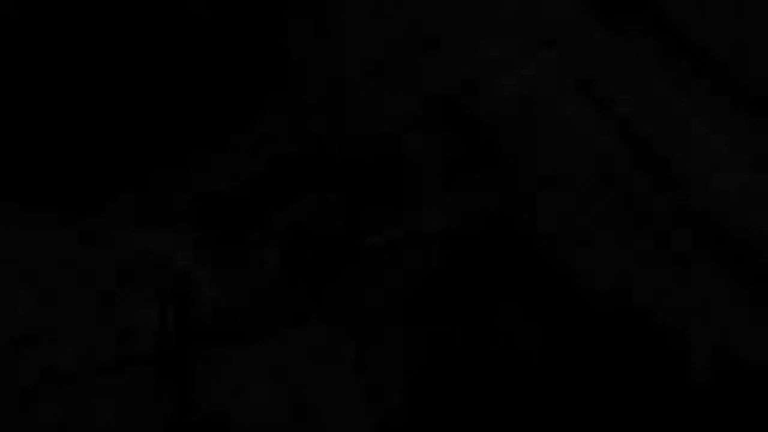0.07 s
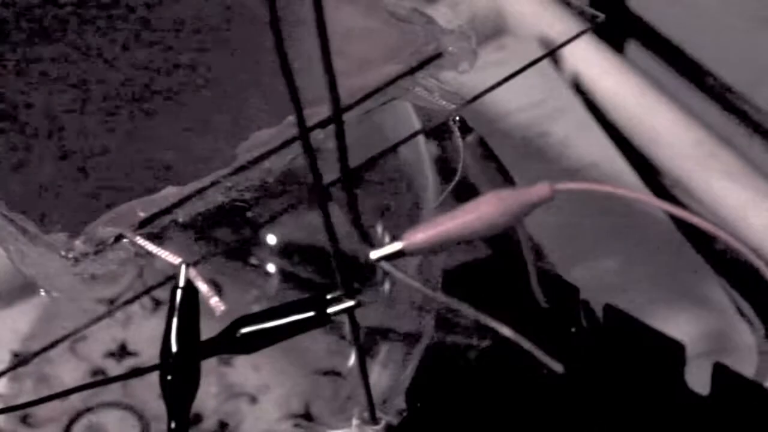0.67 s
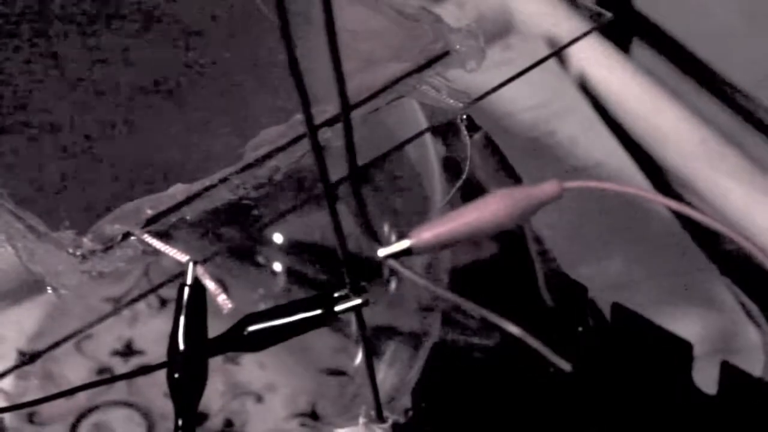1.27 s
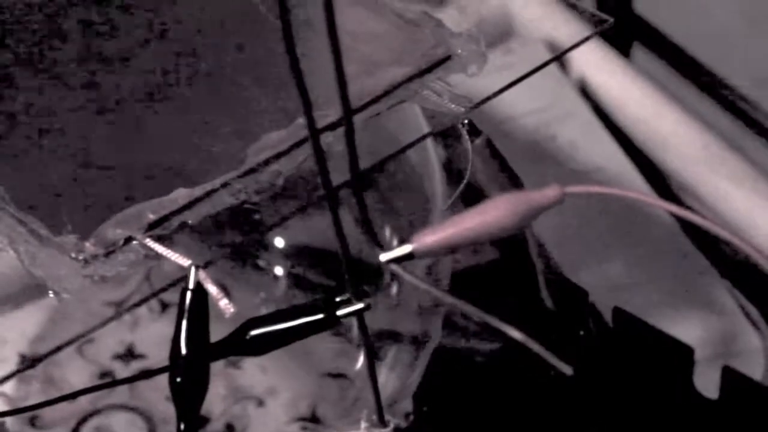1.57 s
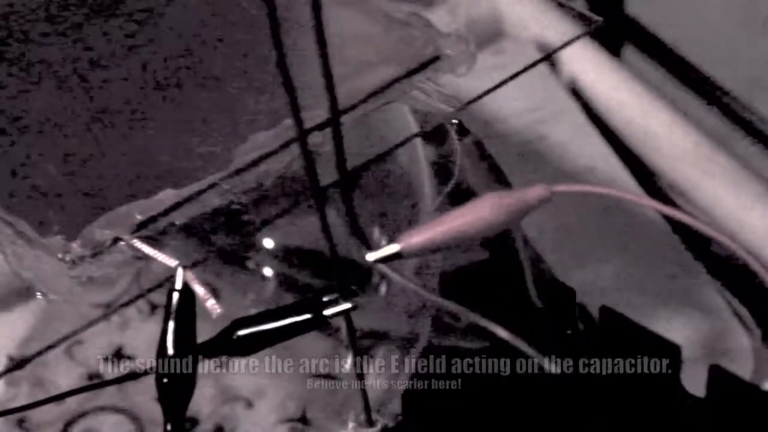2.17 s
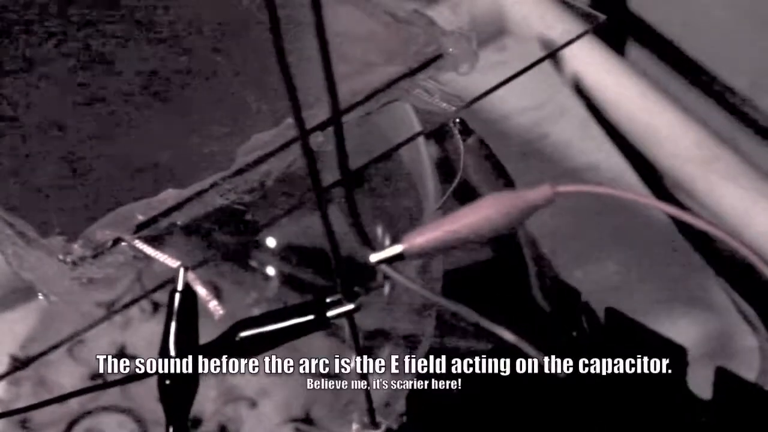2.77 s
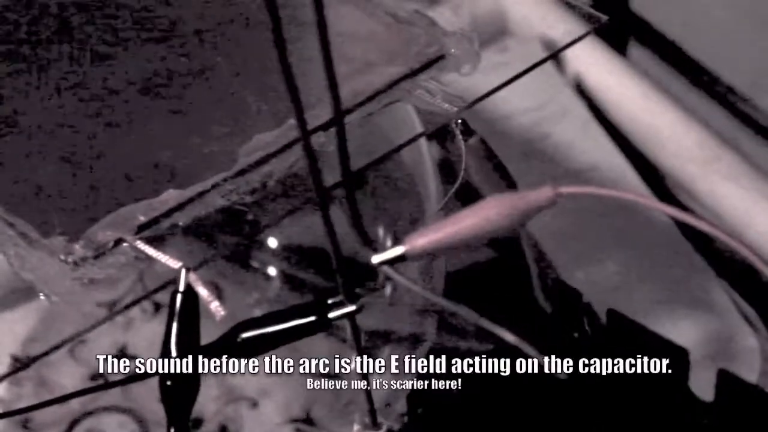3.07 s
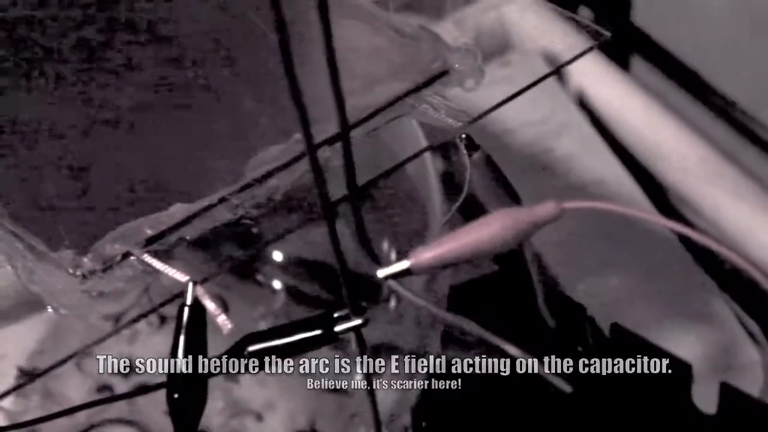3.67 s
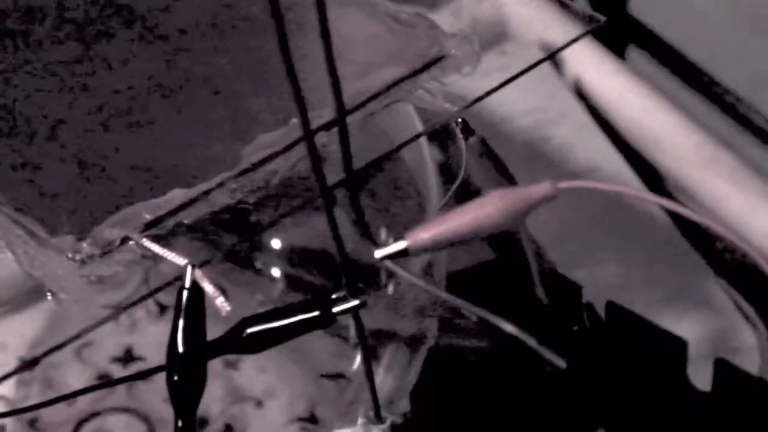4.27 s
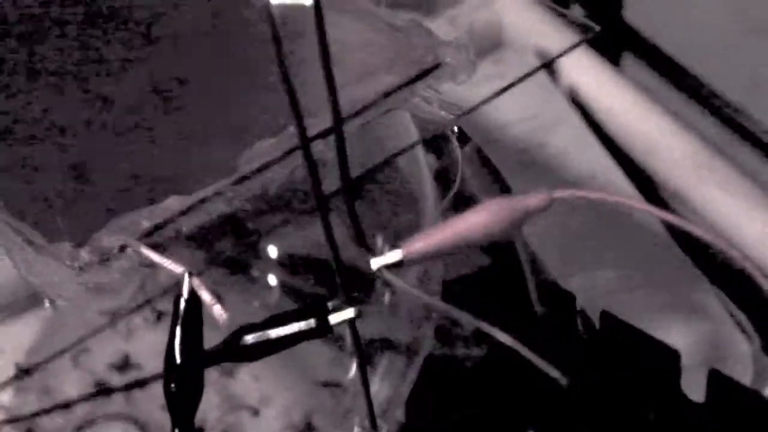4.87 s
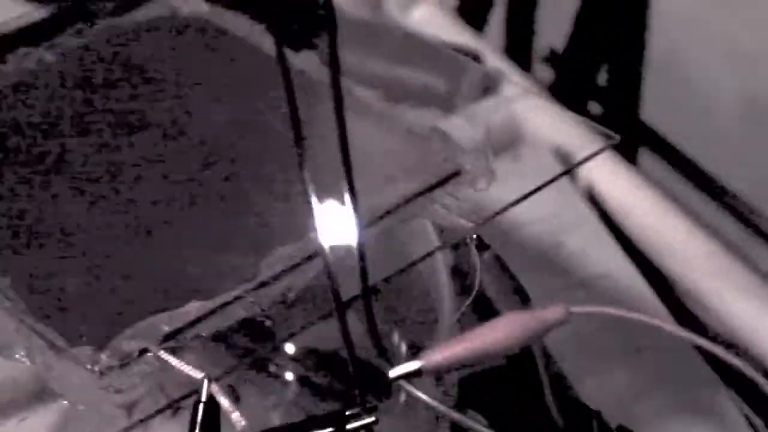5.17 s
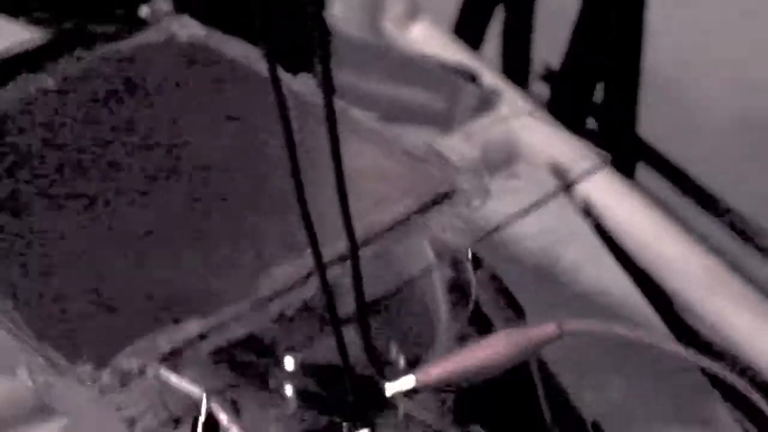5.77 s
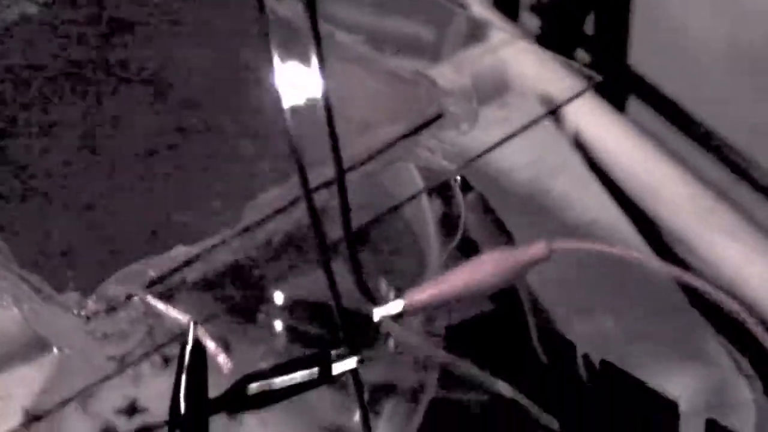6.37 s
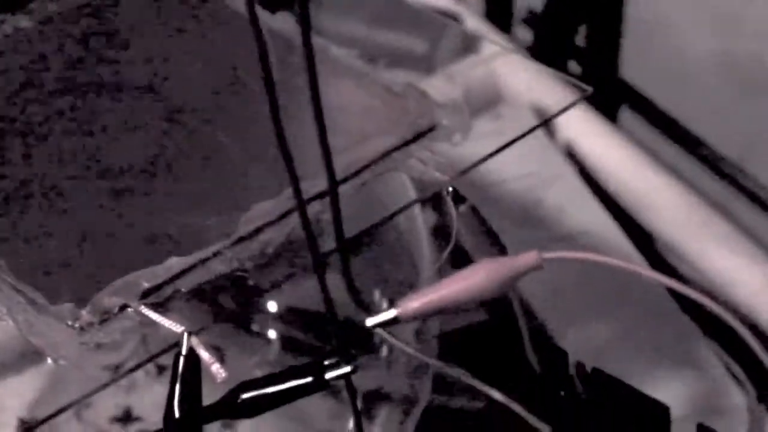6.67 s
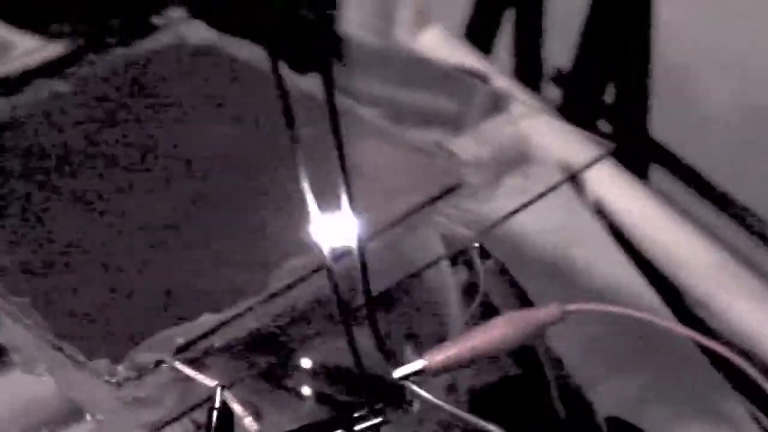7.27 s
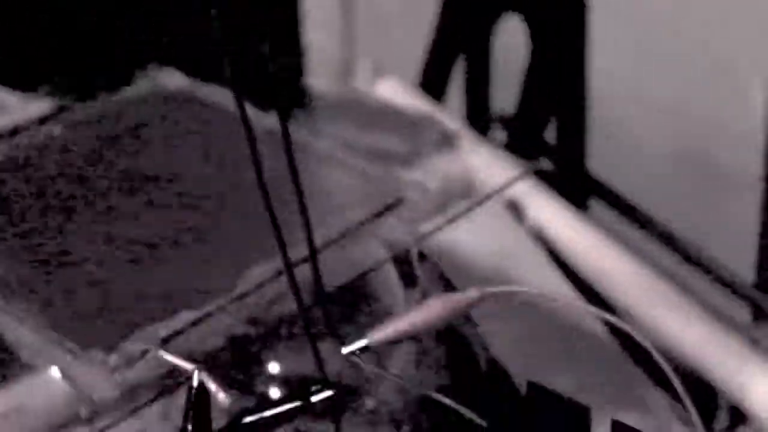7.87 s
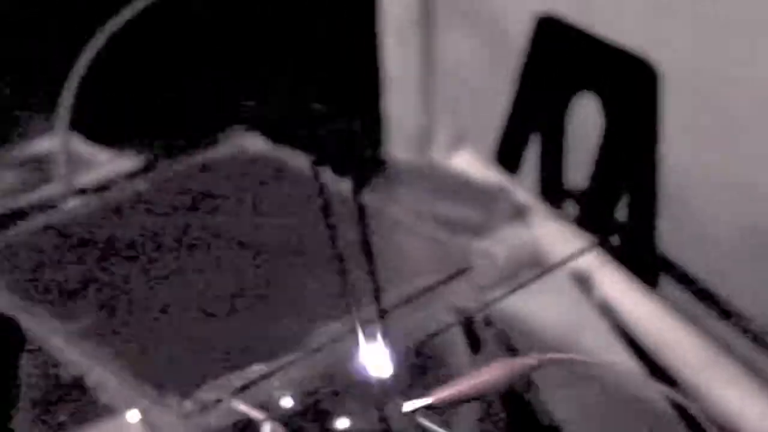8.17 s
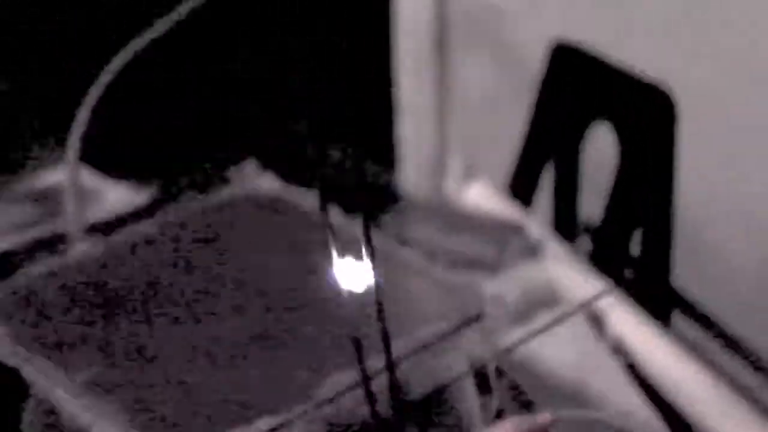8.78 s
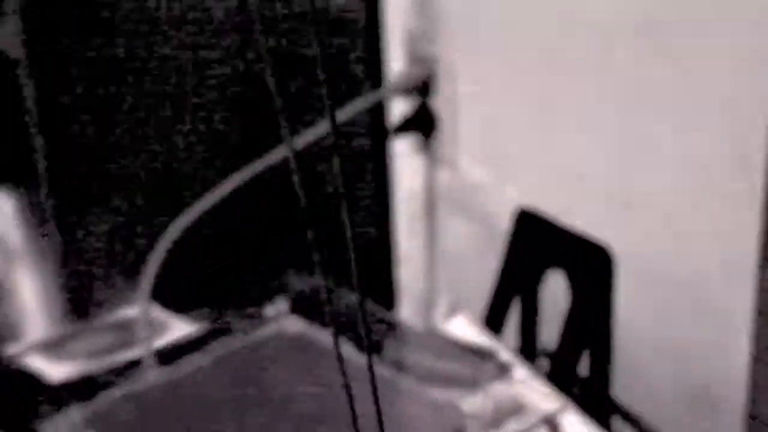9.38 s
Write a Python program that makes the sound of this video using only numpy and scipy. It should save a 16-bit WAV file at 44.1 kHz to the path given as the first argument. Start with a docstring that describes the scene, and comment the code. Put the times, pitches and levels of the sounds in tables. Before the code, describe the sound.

Mains hum and fine sizzling build in a small room until an electric arc cracks alight, sputtering and buzzing harshly five times.

```python
"""First come a soft scrape and small handling clicks over the air of a small room and a faint whine.
Close by stands a high-voltage ladder of two wires. As the mains voltage is raised, a capacitor hums
and tiny discharges (corona) hiss; then the gap breaks down with a bang. Five times an arc catches and
lifts off sputtering; the later ones settle to a buzz, and the last still burns at the end.
The arc strikes anew on every half cycle of the mains and overloads the microphone."""
import sys
import numpy as np
from scipy import signal
from scipy.io import wavfile

SR = 44100
rng = np.random.default_rng(int(sys.argv[2]) if len(sys.argv) > 2 else 0)


def store_pcm(level_fs):
    """Save levels as 16-bit WAV."""
    pcm = np.round(np.clip(level_fs, -1, 1) * 32767).astype(np.int16)
    wavfile.write(sys.argv[1], SR, np.atleast_2d(pcm).T)


N = 420273
TIME = np.arange(N) / SR
PULSE_HZ, BREAKDOWN_S = 120.01, 4.3915  # two pulses per mains cycle; when the gap first gives way

# Levels in the tables are relative: the functions add their own gains.
# each climb of the arc: (strike time [s], lifts off after [s], settles after [s] if it still burns,
# level at the foot [dB], level once lifted [dB], final swell [dB])
ARC_CLIMBS = [(4.398, 0.077, .8, -21.5, -19.5, 4.5), (5.009, 0.12, .46, -23, -18.5, 4.5),
              (5.99, 0.18, 0.73, -26.5, -19, 10.5), (6.865, .207, 0.71, -22, -17, 7),
              (8.224, .18, 0.99, -24.5, -20.5, 4.5)]
# the arc flares up: (time [s], half length [s], extra level [dB], extra body [dB], extra thump [dB])
ARC_FLARES = [(4.503, 0.036, 5.5, 5, 9), (4.625, 0.061, 7, 4, 7), (4.747, 0.043, 3, 4.5, 0),
              (4.906, 0.01, 5, -3, 23), (5.224, .08, 5.5, 3.5, 4), (5.375, 0.053, 3, -2.5, 7),
              (6.25, 0.036, 2.5, 4.5, 2), (6.364, 0.022, 3.5, 5.5, 21), (6.548, 0.02, 3, 1, 20),
              (6.656, 0.015, 4, -7, 27), (7.18, 0.071, 2.5, 4, -9), (7.37, 0.0785, 5.5, 3, -8),
              (7.591, 0.04, 5.5, 6, -9), (8.578, 0.11, 1, 3.5, 0), (8.706, 0.0325, 8, 7.5, 4),
              (8.931, 0.032, 6, 7, 27), (9.027, 0.071, 1.5, -2, 28.5)]
# an old, long arc strikes again within the half cycle: (delay [s], size against the first spark [ratio])
ARC_RESTRIKES = [(.0013, 0.22), (.00215, 0.3)]
# the tone of one spark: (frequency [Hz], level [dB])
SPARK_SPECTRUM = [(100, -42.5), (260, -24.5), (370, -17), (600, -30), (1000, -17), (1600, -11),
                  (2100, -7.5), (2600, -4), (3500, -1), (4800, 2), (6500, 2), (9000, 1), (10500, -3.5),
                  (12000, -8.5), (15500, -17.5)]
# the moving microphone shades the arc:
# (time [s], level [dB], body [dB], treble [dB], top treble against the treble [dB], ring [dB])
MIC_AIM = [(4.4, 1, -.5, 2.5, 3.5, 1.5), (5.8, 0.37, 1, 1.5, -2, 3.5), (7.35, -2.5, -1, 1.5, -0.5, 1),
           (7.68, -1.5, -1.5, 3.5, -9, 4), (7.92, 9, -4.5, -3, -7, -5), (8.12, 3, -2.5, 1.5, 9, -14),
           (8.335, 0.5, -1, -5, -3, -8), (8.375, 1, -2, -2, 23, 0), (8.95, -.5, 1.5, 0.5, 23, 0.5),
           (9.5, 2, 4, -1.5, 11.5, -3)]
# heavy snaps, the first being the breakdown: (time [s], level [dB], decay time [s])
HEAVY_SNAPS = [(4.3916, 13, 0.0031), (4.783, 1.5, 0.0017), (4.899, -2, 0.00049), (4.993, 2.5, 0.002),
               (4.999, 4, 0.0025), (5.356, 3.5, 0.0016), (6.175, -8, 0.00068), (6.649, -5, 0.00084),
               (6.933, -9, 0.00061), (7.203, 4.5, 0.0012), (8.408, -14, .001), (8.692, 3, 0.0012),
               (8.726, 8, .0007), (8.934, 15, 0.00027), (8.942, 6, 0.00036), (9.026, 9, 0.00027),
               (9.1993, 0, .0016)]
# the tone of a heavy snap: (frequency [Hz], level [dB])
SNAP_SPECTRUM = [(60, 5.5), (220, 3.5), (450, -27), (800, -2), (1400, -4), (2300, 11.5), (3200, 2),
                 (5500, 11.5), (9000, 8.5), (15000, -1)]
# the hiss grows with the voltage: (time [s], level [dB])
HISS_LEVELS = [(1.4, -52.5), (1.87, -49), (2.02, -39.5), (2.68, -37.5), (3.25, -29), (3.8, -23.5),
               (4.35, -21.5)]
# the tone of the fine hiss: (frequency [Hz], level [dB])
HISS_SPECTRUM = [(50, -28), (220, 6.5), (800, -0.5), (1000, 7), (1400, 4), (1800, 12), (2300, 12),
                 (2850, 9.5), (3000, 11.5), (3170, 11.5), (6200, 3.5), (9700, 1.5), (11500, -10),
                 (15500, -20.5)]
# the tone of streamers, the coarser threads of discharge: (frequency [Hz], level [dB])
STREAMER_SPECTRUM = [(240, -64), (400, -35), (486, -11), (526, -50), (591, -21), (830, -23), (983, -17.5),
                     (1380, -12), (2970, 0), (3300, -1.5), (4690, -1.5), (7120, -21), (9000, -35),
                     (11700, -34), (19800, -120)]
# the capacitor under rising voltage: (time [s], lowest note [dB], its octave [dB])
HUM_LEVELS = [(1.2, -57, -48), (1.76, -27, -60), (1.79, -27.5, -62), (1.91, -23, -45.5), (3.07, -22, -44.5),
              (3.65, -28, -39), (4.36, -27.5, -36.5)]
# higher notes in the hum: (multiple of the pulse rate [ratio], level against the octave [dB])
HUM_OVERTONES = [(3, -10), (4, -22), (5, -15), (8, -11.5)]
# small handling clicks: (time [s], level [dB])
HANDLING_CLICKS = [(0.384, -20.5), (0.532, -25), (0.55, -24), (0.614, -27), (1.014, -21), (1.154, -23.5),
                   (1.215, -27.5), (1.223, -25), (1.451, -24), (1.51, -27)]
# the notes of a plastic case: (frequency [Hz], level [dB], time to fade by 60 dB [s])
CASE_NOTES = [(930, -22, 0.02), (1550, -0.5, 0.022), (2380, 7, 0.022), (2970, 3, 0.026),
              (5370, 11.5, 0.0049)]
# short high pips: (time [s], level [dB], frequency [Hz])
HIGH_PIPS = [(0.7927, -30, 6360), (0.9078, -14.5, 4520), (1.08, -23, 4590)]
# the tone of the rasp: (frequency [Hz], level [dB])
RASP_SPECTRUM = [(40, -19), (200, -19), (1000, -13.5), (2200, -11), (4000, -15), (8000, -39)]
# dull knocks on either side of the rasp: (time [s], level [dB])
DULL_KNOCKS = [(8.309, -24), (8.355, -23)]
# the tone of the room air: (frequency [Hz], level [dB])
AIR_SPECTRUM = [(30, -3), (70, 0), (130, 6.5), (230, 3.5), (400, -4), (750, -6.5), (1100, -6), (3000, -6.5),
                (4700, -10.5), (6000, -13), (9000, -19.5), (12000, -28), (15500, -43)]
# a faint machine whine: (frequency [Hz], level [dB])
WHINE_NOTES = [(995.9, -65), (2019, -64.5), (3009, -67)]
# echoes from near surfaces: (delay [s], gain [ratio])
NEAR_ECHOES = [(.0015, 0.35), (.004, 0.34), (.0011, -0.1), (.0065, 0.32), (.0072, .2), (.0095, -0.03),
               (0.012, 0.13)]
# how long the room rings: (frequency [Hz], time to fade by 60 dB [s])
ROOM_DECAY = [(200, 0.25), (2000, 0.2), (6000, 0.16), (15000, 0.17)]
# the sound fades in: (time [s], gain [ratio])
FADE_IN = [(0, 0), (.14, 0), (.2, .35), (.3, .65), (.45, 1)]


def arc(arc_db=-3.5, body_db=-10, thump_db=-37, ring_db=-14.5, body_db_per_s=4.5, thump_db_per_s=1):
    """Bursts of sparks make a buzz that deepens as the arc stretches up the wires."""
    age, strength_db, spark_count, lifted = climb(TIME)
    _, flare_body_db, flare_thump_db = flares(TIME)
    aim_db, low_db, high_db, top_db, metal_db = follow(MIC_AIM, TIME)
    low_db = low_db + body_db_per_s * age + flare_body_db
    bursts, leaders = sparks()
    crack = colour(bursts, SPARK_SPECTRUM)
    # split the crackle into four bands and balance them anew
    body, dull, no_top = (below(crack, hz) for hz in (3300, 6800, 11200))
    bright, top = no_top - dull, crack - no_top
    treble = (bright + amp(top_db) * top) / np.sqrt(bright.var() + amp(2 * top_db) * top.var())
    tone = evened(dull - body) + amp(body_db + low_db) * evened(body) + amp(high_db) * treble
    tone -= 0.35 * (1 - lifted) * resonate(tone, hz=2970, q=5.1)  # hollow while still at the foot
    # the sputtering sparks set off a narrow metallic ring
    ring = evened(resonate(crack, hz=2075, q=12))
    tone += amp(ring_db + metal_db) * ring * np.clip(spark_count / 1.8, .7, 1.4)
    # a low thump comes with each leading spark
    thump = colour(leaders, [(20, -24), (110, 3.5), (240, 11.5), (450, 7.5), (850, 6.5), (1500, 5.5),
                             (4000, -50)])
    tone += thump * amp(thump_db + thump_db_per_s * age + flare_thump_db)
    return tone * amp(strength_db + aim_db + arc_db)


def sparks(short_gap_hz=5900, long_gap_hz=3900, late_s=.00018, limp_s=.00005, slots=14):
    """Each half cycle the gap fires and recharges in a quick burst. Gives all sparks, and the leaders."""
    start = BREAKDOWN_S + np.arange(5, int((N / SR - BREAKDOWN_S) * PULSE_HZ)) / PULSE_HZ
    age, _, spark_count, _ = climb(start)
    rate_hz = long_gap_hz + (short_gap_hz - long_gap_hz) * np.exp(-age / .3)  # long gaps recharge slowly
    rate_hz *= np.exp(0.0624 * np.interp(start, TIME, drift(20)))
    sputter = np.clip((spark_count - 2) / 3, 0, 1)  # long bursts are erratic
    late, spread, loud, heavy = rng.standard_normal((len(start), 4)).T
    waits = np.exp(0.2065 * rng.standard_normal((len(start), slots))) / rate_hz[:, None]
    first = start + late_s * (np.maximum(.7 * sputter, 0.17) * late + 2.2 * sputter - 1.1)
    first += age * (limp_s * (-1) ** np.arange(len(start)) - .0003 * age)  # long arcs limp, fire early
    times = first[:, None] + np.cumsum(waits, 1) - waits[:, :1]
    burst_length = np.maximum(spark_count * np.exp(0.39 * sputter * spread), 1)
    size = np.clip(burst_length[:, None] - np.arange(slots), 0, 1)
    size *= amp(2.3 * rng.standard_normal(size.shape))
    size += 0.053 * rng.exponential(1, size.shape) * (rng.random(size.shape) < .25)  # weak stray sparks
    # repeat strikes grow in as the arc gets old
    delay, repeat_size = np.transpose(ARC_RESTRIKES)
    jitter_s = .00011 * rng.standard_normal((len(start), len(delay)))
    old = ramp((age - 0.96) / 0.73)
    times = np.hstack([times, first[:, None] + delay + jitter_s])
    size = np.hstack([size, np.outer(old * size[:, 0], repeat_size)])
    burst_db = (1 + 3 * sputter) * loud
    size *= (amp(burst_db) / np.linalg.norm(size, axis=1))[:, None]
    leader_db = 7 * np.sqrt(sputter) * np.clip(heavy, -2, 1.5)
    return click_train(times, size), click_train(first, amp(leader_db))


def climb(t, lift_s=.02, settle_s=0.148, swell_s=.05, catch_s=0.022):
    """The rising arc at times t: age [s], level [dB], sparks per half cycle and lift-off (0 to 1)."""
    strikes = [row[0] for row in ARC_CLIMBS]
    which = np.maximum(np.searchsorted(strikes, t) - 1, 0)
    strike, lift, settle, foot_db, lifted_db, swell_db = np.array(ARC_CLIMBS)[which].T
    age = t - strike
    time_left = np.append(strikes[1:], N / SR)[which] - t
    lifted, settled = ramp((age - lift) / lift_s), ramp((age - settle) / settle_s)
    flare_db = flares(t)[0]
    level_db = foot_db + (lifted_db - foot_db) * lifted + swell_db * np.exp(-time_left / swell_s)
    level_db += flare_db - 19 * np.exp(-abs(age) / catch_s)  # a fresh arc takes a moment to catch
    at_foot, sputtering, steady = 2.39, 3.6, 1.33  # sparks per half cycle, before flares add more
    spark_count = at_foot + (sputtering - at_foot) * lifted + (steady - sputtering) * settled
    return np.maximum(age, 0), level_db, spark_count + 0.32 * flare_db, lifted


def flares(t):
    """The arc flares up briefly: extra level, body and thump [dB] at times t."""
    return sum(np.outer(dbs, np.exp(-((t - s) / half_s) ** 2)) for s, half_s, *dbs in ARC_FLARES)


def snaps(bang_db=-2):
    """Stored charge empties through the gap: hard cracks with a biting midrange."""
    loudness = sum(amp(db + bang_db) * (TIME > s) * np.exp(-abs(TIME - s) / decay)
                   for s, db, decay in HEAVY_SNAPS)
    return loudness * colour(rng.standard_normal(N), SNAP_SPECTRUM)


def corona(hiss_db=6.5, streamer_db=-18.5, sag_db_per_s=2, grain_db=3.5, join_s=3.04):
    """Countless tiny discharges crowd at each voltage peak; coarse streamers join at higher voltage."""
    fine_db, = follow(HISS_LEVELS, TIME)
    throb = np.cos(2 * np.pi * PULSE_HZ * TIME)
    joined = ramp((TIME - join_s) / 0.55)
    noise = rng.standard_normal((2, N))
    fine, coarse = noise * amp(grain_db * np.minimum(rng.exponential(1, (2, N)), 5))
    hiss = colour(fine * (1 + 0.25 * throb), HISS_SPECTRUM)
    whistle = amp(-16) * evened(resonate(hiss, hz=3005, q=60))
    hiss -= 0.81 * joined * below(hiss, 3900)  # the streamers take over its lower part
    hiss = (hiss + whistle) * amp(fine_db + hiss_db)
    streamers = colour(coarse * (1 + 0.11 * throb), STREAMER_SPECTRUM)
    streamers *= amp(streamer_db - sag_db_per_s * (TIME - join_s))
    flutter = amp(.5 * drift(25))
    return (hiss + streamers * joined) * flutter * voltage_on(1.27)


def capacitor_hum(waver=0.028):
    """The electric field squeezes the capacitor twice per mains cycle."""
    base_db, octave_db = follow(HUM_LEVELS, TIME)
    angle = 2 * np.pi * PULSE_HZ * TIME
    upper = np.sin(2 * angle)
    for multiple, db in HUM_OVERTONES:
        upper += amp(db) * np.sin(multiple * (angle + rng.uniform(0, 2 * np.pi)))
    upper *= amp(octave_db - 1) * (1 + waver * drift(15))
    return np.sqrt(2) * (amp(base_db) * np.sin(angle) + upper) * voltage_on(1.17)


def voltage_on(from_s):
    """Voltage stands across the gap (0 to 1) from from_s until the breakdown."""
    return np.clip((TIME - from_s) / 0.11, 0, 1) * np.clip((BREAKDOWN_S + 0.011 - TIME) / 0.011, 0, 1)


def handling_clicks(rattle_s=0.004):
    """Each tiny rattle from handling makes a plastic case ring."""
    out, t = np.zeros(N), TIME[:SR // 20]
    ring = sum(amp(db - 60 * t / fade_s) * np.sin(2 * np.pi * hz * t) for hz, db, fade_s in CASE_NOTES)
    for s, db in HANDLING_CLICKS:
        rattle = rng.standard_normal(len(t)) * np.exp(-t / rattle_s)
        click = evened(signal.fftconvolve(rattle, ring)[:len(t)])
        click += 0.47 * evened(below(rattle, 6700, order=2))
        add(out, s, amp(db - 9) * 2.1 * click / abs(click).max())
    return out


def pips(half_s=0.0004):
    """High pips, each only a few cycles long."""
    out, t = np.zeros(N), TIME[:SR // 20]
    for s, db, hz in HIGH_PIPS:
        add(out, s, amp(db + 2) * np.exp(-(t / half_s - 2.4) ** 2) * np.sin(2 * np.pi * hz * t))
    return out


def rasp(rasp_db=-23, middle_s=8.337, knock_hz=260, knock_s=0.0012):
    """A short, dull rasp between two soft knocks as the last climb begins."""
    swell = np.exp(-((TIME - middle_s) / .018) ** 4)
    out = amp(rasp_db) * colour(rng.standard_normal(N), RASP_SPECTRUM) * swell
    t = TIME[:SR // 20]
    for s, db in DULL_KNOCKS:
        add(out, s, amp(db) * t / knock_s * np.exp(1 - t / knock_s) * np.sin(2 * np.pi * knock_hz * t))
    return out


def scrape(scrape_db=-41, middle_s=0.2, half_s=0.12):
    """A soft scrape at the start: a narrow band of noise swells and fades."""
    band = colour(rng.standard_normal(N), [(1200, -7), (2050, -18), (2350, 4), (2700, -17), (6000, -49)])
    return amp(scrape_db) * band * np.exp(-((TIME - middle_s) / half_s) ** 2)


def background(air_db=-42, waver=0.00266):
    """Room air and a thin, wavering machine whine."""
    clock = np.cumsum(1 + waver * drift(6.8)) / SR
    whine = sum(amp(db) * np.sin(2 * np.pi * hz * clock) for hz, db in WHINE_NOTES)
    air = amp(air_db) * colour(rng.standard_normal(N), AIR_SPECTRUM)
    return air + np.sqrt(2) * whine * (1 + 1.8 * drift(5))


def room(x, tail_db=-4, sway_s=0.000124, build_s=0.0052):
    """Near surfaces echo the treble, shifting as the microphone moves; a short tail follows."""
    thrown = x - 0.66 * below(x, 1100)
    near = x + sum(gain * np.interp(TIME - delay - sway_s * drift(.7), TIME, thrown)
                   for delay, gain in NEAR_ECHOES)
    scatter = rng.standard_normal(SR // 2) * (rng.random(SR // 2) < .15)
    hz, t, bands = signal.stft(scatter, SR, nperseg=256)
    bands = bands * amp(-60 * t / at_frequency(ROOM_DECAY, hz)[:, None])
    tail = signal.istft(bands, SR, nperseg=256)[1]
    tail *= 1 - np.exp(-TIME[:len(tail)] / build_s)
    wet = near + amp(tail_db) * signal.oaconvolve(thrown, tail / np.linalg.norm(tail))[:N]
    return wet * x.std() / wet.std()


def turned_away(x, shade=0.77, shade_hz=9000, middle_s=8.03, half_s=0.28):
    """For a moment the microphone is turned away and misses the highest treble."""
    away = np.exp(-((TIME - middle_s) / half_s) ** 4)
    return x - shade * away * (x - below(x, shade_hz, order=6))


def amp(db):
    """Turns decibels into gain."""
    return 10 ** (np.asarray(db) / 20)


def evened(x):
    """Scales x to an average (rms) level of 1."""
    return x / np.sqrt(np.mean(x ** 2) + 1e-20)


def follow(rows, t):
    """Each column of a time table at times t."""
    s, *columns = np.transpose(rows)
    return [np.interp(t, s, column) for column in columns]


def at_frequency(rows, hz):
    """Looks up a frequency table at hz."""
    f, value = np.transpose(rows)
    return np.interp(np.log(hz + 1), np.log(f + 1), value)


def add(mix, s, sound):
    """Mixes a sound in at time s."""
    part = mix[round(s * SR):][:len(sound)]
    part += sound[:len(part)]


def colour(x, spectrum, size=2048):
    """Gives x the tone of a spectrum, at level 1; the filter rings only after a click, never before."""
    log_gain = np.log(amp(at_frequency(spectrum, abs(np.fft.fftfreq(size, 1 / SR)))))
    taps = np.fft.ifft(np.exp(np.conj(signal.hilbert(log_gain)))).real
    return evened(signal.oaconvolve(x, taps)[:N])


def below(x, hz, order=3):
    """The part of x under hz."""
    return signal.sosfiltfilt(signal.butter(order, hz, fs=SR, output="sos"), x)


def resonate(x, hz, q):
    """The part of x around hz; a higher q is narrower."""
    return signal.lfilter(*signal.iirpeak(hz, q, fs=SR), x)


def drift(top_hz):
    """A slow random wobble of level 1."""
    t = TIME[::128]
    rates = np.geomspace(top_hz / 10, top_hz, 12)
    waves = sum(np.sin(2 * np.pi * (hz * t + rng.random())) / np.sqrt(hz) for hz in rates)
    return np.interp(TIME, t, evened(waves))


def ramp(x):
    """A smooth step from 0 to 1, one unit wide, centred on x = 0."""
    return .5 + .5 * np.sin(np.pi * np.clip(x, -.5, .5))


def click_train(times, size):
    """Clicks at their exact places between samples."""
    place = times.reshape(-1, 1) * SR
    index = place.astype(int) + np.arange(-8, 9)
    clicks = size.reshape(-1, 1) * np.sinc(index - place) * np.hanning(index.shape[1])
    return np.bincount(index.ravel(), clicks.ravel(), N)[:N]


def scene(recede_db=-10):
    """All sources at the microphone; the background drops once the arc burns."""
    air = background() * amp(recede_db * (TIME > BREAKDOWN_S))
    ladder = room(turned_away(arc() + snaps()))
    mix = ladder + rasp() + corona() + capacitor_hum() + handling_clicks() + pips() + scrape() + air
    return mix[None]


def record(dry, mic_limit=2.1, top_hz=15750):
    """The microphone gives way on one side of the wave, then the input cuts the peaks off flat."""
    lost = np.clip(dry - mic_limit, 0, 1)
    lopsided = dry - signal.lfilter(*signal.butter(1, 80, "high", fs=SR), lost)
    clipped = np.clip(lopsided, -1, 1) * follow(FADE_IN, TIME)[0]
    clipped -= below(clipped, 40, order=1)  # take out the deepest rumble
    treble_cut = signal.firwin(255, top_hz, window=("kaiser", 8), fs=SR)
    return signal.oaconvolve(clipped, treble_cut[None], "same")


dry = scene()
out = record(dry)
store_pcm(out)
```